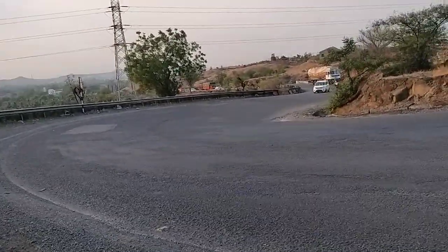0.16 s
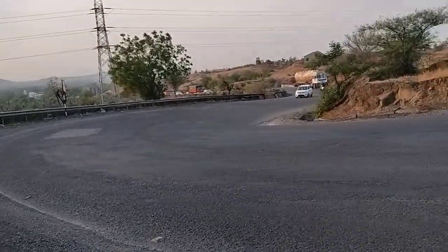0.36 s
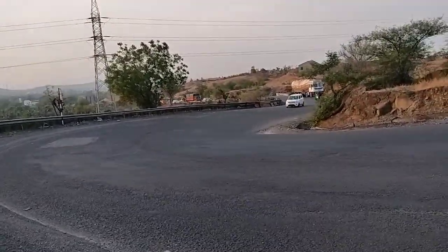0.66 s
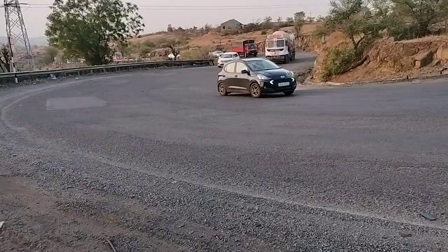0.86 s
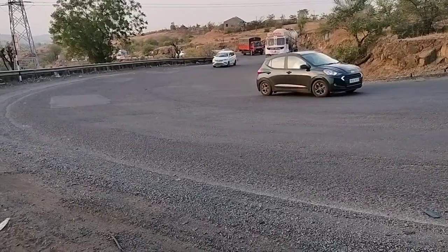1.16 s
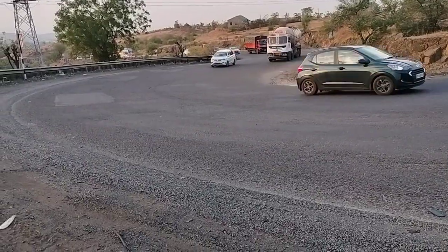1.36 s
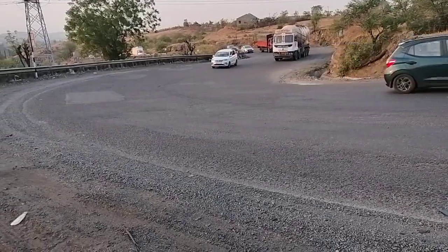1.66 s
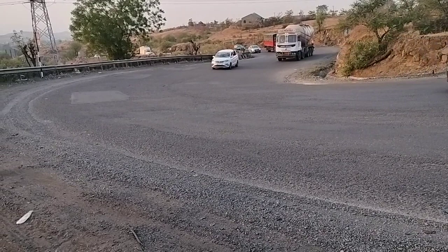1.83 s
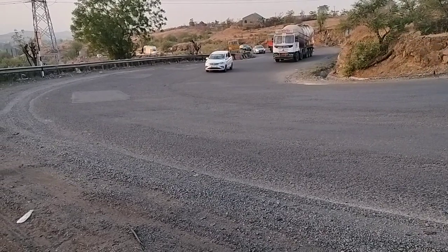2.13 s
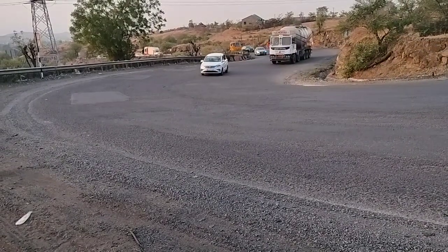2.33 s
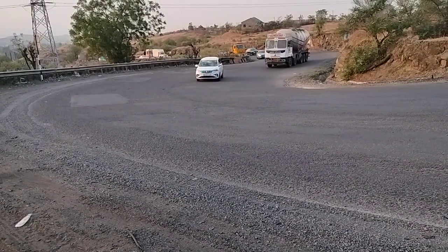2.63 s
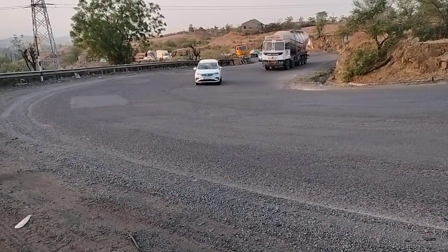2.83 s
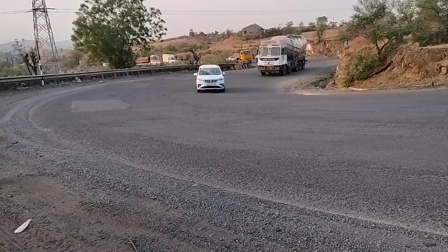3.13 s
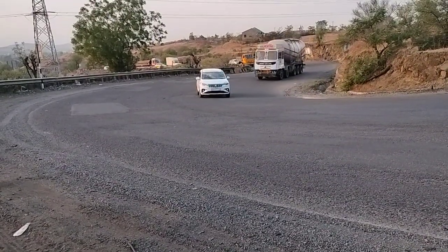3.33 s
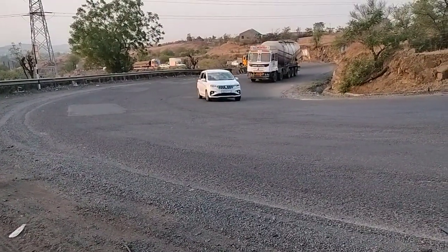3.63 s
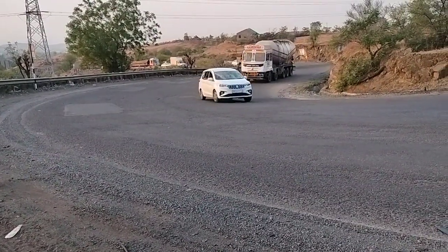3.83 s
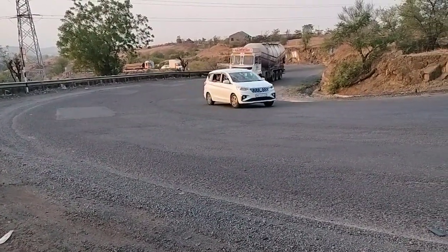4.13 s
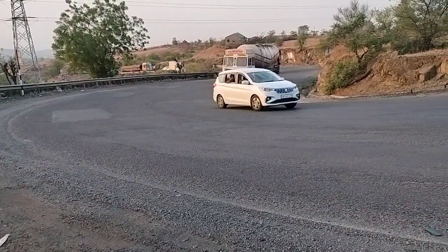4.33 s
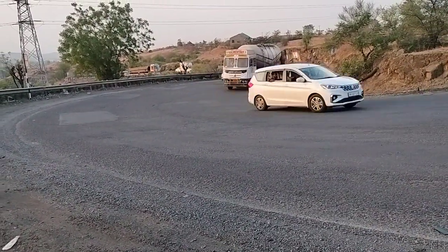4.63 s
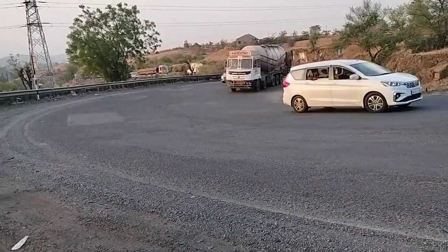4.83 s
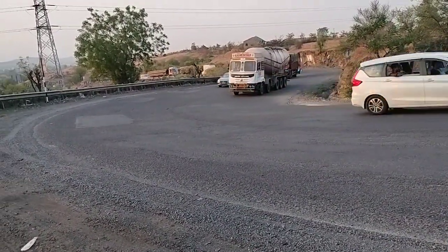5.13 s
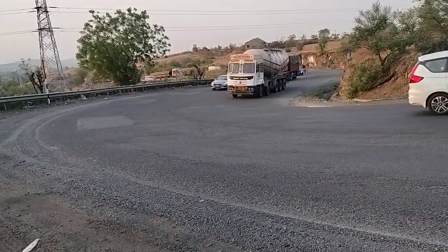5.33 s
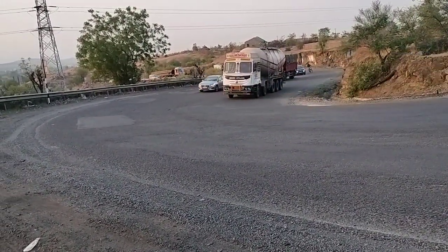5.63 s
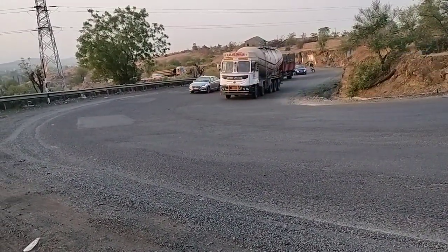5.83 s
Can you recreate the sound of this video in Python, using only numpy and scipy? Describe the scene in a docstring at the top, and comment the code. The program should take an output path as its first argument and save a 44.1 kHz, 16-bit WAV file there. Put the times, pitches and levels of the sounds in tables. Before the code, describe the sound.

From 0 to 0.77 s, a soft, dark rumble of distant engines and tyres is heard, with three low exhaust thumps and a faint steady hum. At about 0.77 s small sharp clicks mark an abrupt jump to loud, close traffic. A car sweeps past almost at once, its tyres roaring, then rasping over coarse asphalt with tiny stone crunches until about 1.9 s. Beneath it, heavy diesel trucks throb in a dense low-mid drone with rattling engine clatter, irregular exhaust puffs and wandering engine notes. A thin gear whine rises from 1 to 4 s. Around 4.5 s a second car partly masks the trucks; very faint brake squeaks come at 4.4-4.7 s, and its tyre roar peaks at 5 s. At 5.43 s one very short, rasping horn toot sounds, with quick rock echoes. The trucks keep growling to the end at 6 s. Wide roadside stereo, little reverberation.

```python
"""A far rumble of engines and tyres comes first, under heavy exhaust puffs; then, all at once, traffic is close.
Diesel trucks labour round a hill bend below a rock cutting: pulses at the firing rate ring exhausts and blocks.
Two cars sweep past on coarse asphalt: shaped noise gives tyre roar and hiss, and the cars screen the trucks.
Gliding sines make engine notes, a silencer boom, a gear whine and faint brake squeaks; a horn sounds once."""
import sys
import numpy as np
from scipy import signal
from scipy.fft import rfft, irfft, next_fast_len
from scipy.io import wavfile
from scipy.ndimage import uniform_filter1d, minimum_filter1d, map_coordinates

SR = 44100
rng = np.random.default_rng(int(sys.argv[2]) if len(sys.argv) > 2 else 0)


def inscribe(sig):
    """Save sig as 16-bit PCM at rate SR to the path in sys.argv[1].

    A 1-D sig is mono; a 2-D sig holds one channel per row.
    Samples are clipped to [-1, 1] before scaling.
    """
    pcm = np.round(np.clip(np.atleast_2d(sig).T, -1, 1) * 32767)
    wavfile.write(sys.argv[1], SR, pcm.astype(np.int16))


N = 264159

CLOSE_S, CLOSE_RISE_S = 0.768, 0.002  # when the near traffic takes over, and how long that takes
TOP_HZ = 15300  # upper band limit

# Far traffic, resonances of rumble and road noise: frequency_hz, gain_db
FAR_RUMBLE_BODY = [(21, -39), (35, -26), (91, -8.5), (136, -5), (176, 2), (231, -1), (324, -1), (350, -10),
                   (424, -8.5), (520, -23), (680, -48.5), (1140, -120)]
FAR_ROAD_BODY = [(260, -42), (450, -9), (477, 1), (762, 2.5), (1040, -5.5), (1350, -5), (1990, -14),
                 (2540, -11.5), (2780, -17), (3700, -20), (4550, -32.5), (5790, -36.5), (6950, -56),
                 (9040, -72), (15300, -120)]
FAR_RUMBLE_DB, FAR_ROAD_DB = -25.5, -35

# Likeness of the left and right signals, near and far: frequency_hz, likeness (1 = identical)
ALIKE = [(60, 0.94), (310, 1), (420, 0.76), (510, 0.54), (620, .95), (830, .93), (990, .55), (1370, 0.39),
         (1700, .7), (2050, 0.9), (2450, .36), (2900, .65), (3650, 0.36), (4500, .45)]
FAR_ALIKE = [(100, 0.25), (400, 0.52), (1600, 0.81), (3700, .12)]
# Level difference, left minus right, near and far: frequency_hz, difference_db
LEAN = [(80, 0.5), (220, 2), (400, 7), (550, -7), (970, 10.5), (1200, -1), (1500, -2.5), (1700, 8.5),
        (2600, 4), (3400, 3.5), (3950, -0.5), (5300, 2.5)]
FAR_LEAN = [(100, -9.5), (170, -8), (290, 1.5), (900, 3.5), (2300, 5.5), (6000, 0.5)]
# Phase by which the left microphone leads, near and far: frequency_hz, lead_rad
LEAD = [(330, .05), (470, -1), (580, .35), (910, .35), (1040, -2.5), (1250, -2.2), (1500, .3), (1950, -2.9),
        (2150, 1.9), (2300, .2), (2500, -2.3), (2750, 2.7), (3000, 1.1), (3900, .8), (4400, 1.9),
        (5500, .7)]
FAR_LEAD = [(300, -.1), (600, 1), (860, .5), (980, -2.8), (2600, -1.8)]
# Reverberation of the rock face: frequency_hz, t60_s
CUTTING = [(150, 0.25), (1000, 0.93), (3000, 0.6), (8000, 0.1)]

# Clicks as the traffic jumps closer: start_s, peak_db
CLICKS = [(0.771, -11.5), (0.793, -25), (0.813, -13.5)]
# Heavy exhaust puffs: start_s, gain_db
PUFFS = [(0.027, -13), (0.348, -13.5), (0.669, -13), (1.293, -8), (1.54, -10), (2.02, -9), (3.069, -7.5),
         (3.405, -9), (3.59, -8), (4.052, -9), (4.23, -8), (4.305, -8), (4.645, -8.5), (5.281, -7.5),
         (5.812, -8)]
# Engine notes that stand clear of the din: start_s, end_s, first_hz, last_hz, level_db
HUMS = [(-0.2, 0.8, 355, 356, -37), (0.75, 2.1, 98, 107, -37), (1.2, 3.7, 409, 447, -34),
        (1.0, 1.85, 558, 568, -38), (0.72, 1.08, 284, 295, -24.5), (1.15, 2.3, 247, 234, -23.5),
        (1.7, 3.4, 358, 349, -29.5), (1.85, 3.0, 297, 309, -26), (3.18, 3.55, 240, 245, -21.5),
        (3.35, 4.0, 303, 311, -22.5), (3.98, 4.32, 238, 244, -21.5), (4.22, 4.56, 288, 291, -21.5),
        (4.0, 4.9, 165, 174, -28.5), (4.5, 5.9, 104, 106, -38), (5.1, 5.5, 281, 280, -20.5),
        (5.65, 6.15, 319, 324, -24.5)]
HUM_FADE_S, HUM_WAVER_DB = 0.15, 1.6

# Brake linings: centre_s, half_length_s, pitch_hz, peak_db
SQUEAKS = [(4.45, 0.05, 2961, -49), (4.68, 0.08, 2961, -47), (4.62, .075, 3704, -45.5)]

# Horn diaphragm: harmonic_number, gain_db
HORN_HARMONICS = [(6, -23), (7, -28), (8, -43), (9, -35.5), (11, -49), (12, -48), (13, -58), (16, -71),
                  (18, -69), (19, -79)]
# Discrete horn echoes from the rocks: delay_s, gain_db
HORN_ECHOES = [(.044, -11), (.076, -18)]
HORN_HZ, HORN_RASP, HORN_T60_S = 435.2, 0.17, 0.025  # settled pitch, roughness, decay after release
HORN_SHARP, HORN_SETTLE_S = 0.025, 0.007  # share by which it starts sharp, and time constant of settling

# Passing cars: screening_centre_s, screening_db, closest_s, roar_db, hiss_db
CARS = [(1.2, 4, 0.82, -28, -39), (4.45, 4.5, 5.01, -22, -40)]
# Share of the screening felt by: clatter, tyre_roar, tread_hiss
SCREENED = (0.58, 0.94, 0.64)
SCREEN_S = 0.37  # half the time for which a car hides the trucks
PASS_S = 0.13  # a car's closest distance over its speed
# Resonance of a car's low drone: frequency_hz, gain_db
CAR_BODY = [(25, -44.5), (50, -22), (90, -7), (125, -2), (170, 9), (220, -11.5), (400, -42.5), (900, -100)]
CAR_DRONE_DB, DRONE_S = -29.5, 0.8  # level and half length

# Tyre roar, truck tread hiss and car tread hiss: frequency_hz, gain_db
ROAR = [(280, -36), (480, -9), (527, -9), (561, -5), (675, 1), (789, -0.5), (965, -4.5), (1080, -13.5),
        (1400, -15.5), (1820, -33.5), (3080, -120)]
TREAD = [(2400, -29.5), (3350, -11.5), (3720, -1), (4100, -5), (4550, -9.5), (5000, -7.5), (5600, -9),
         (6000, -13.5), (6400, -25), (7000, -26.5), (8000, -49), (10000, -100)]
CAR_TREAD = [(1000, -25.5), (2000, -7.5), (2900, -3), (3800, -4), (4600, -16.5), (6000, -21.5), (7000, -42),
             (10000, -100)]
ROAR_DB, HISS_DB = -20, -48  # the trucks' tyres
# Swells of the trucks' tread hiss: centre_s, rise_db
HISS_SWELLS = [(1.9, 2.5), (3.55, 5.5), (5.15, 3), (5.8, 4.5)]
SWELL_S = 0.4  # half the length of a swell

# Sideways tread rasp of the first car: frequency_hz, gain_db
SCRUB = [(1500, -35), (2400, -3.5), (2900, 4.5), (3300, -4), (3800, -4), (4500, -19.5), (7000, -47.5),
         (10000, -100)]
SCRUB_S, SCRUB_HALF_S, SCRUB_DB = 1.32, 0.55, -41
# Stones crunched under those tyres: start_s, level_db (10 dB above the rms at the height of the crunch)
STONES = [(0.962, -29), (1.004, -25)]

# Gear whine as a truck gathers speed: time_s, pitch_hz, level_db
WHINE = [(1.0, 1110, -51), (1.45, 1149, -45.5), (1.8, 1310, -41), (2.5, 1356, -48), (3.0, 1400, -44),
         (3.65, 1500, -41), (4.1, 1521, -41.5), (5.3, 1495, -52)]
BOOM_HZ, BOOM_WIDTH_HZ = 248.5, 13  # resonance of the tanker's silencer
BOOM_DB, BOOM_WAVER_DB = -19.5, 2

# Firing rates of the tanker and of the truck behind it: time_s, firing_hz
TANKER = [(0.77, 70.04), (1.3, 74.38), (2.2, 78.43), (3.5, 78.2), (5.1, 82.82), (5.65, 83.8), (6, 87.8)]
FOLLOWER = [(0.77, 96.4), (1.3, 101.8), (2, 107.7), (2.7, 109.6), (3.6, 104.3), (4.4, 98.23), (5.3, 97.5),
            (6, 107)]
# Resonance of the exhaust pipes and of the engine blocks: frequency_hz, gain_db
PIPE = [(25, -48), (45, -32.5), (75, -24.5), (100, -18.5), (125, -12), (172, -5.5), (208, -5), (245, -1),
        (290, 1), (335, -2.5), (400, -8.5), (440, -10.5), (480, -19.5), (560, -20), (730, -40.5),
        (1300, -100)]
BLOCK = [(650, -28), (1100, 0), (1320, -6.5), (1670, 2.5), (1970, -9), (2230, -1), (2650, -9), (2920, -7.5),
         (3260, -11.5), (3610, -14.5), (4200, -35.5), (5460, -45), (9240, -120)]
# Modes of the thin engine covers: centre_hz, width_hz, gain_db
COVERS = [(1706, 110, -1.5), (2240, 170, -6), (3060, 600, -17.5), (3610, 94, -13.5), (3980, 120, -21)]
# Exhausts as they surge and ease: time_s, level_db
EXHAUST = [(0.77, -15), (1.1, -15.5), (1.5, -17.5), (1.9, -15.5), (2.6, -15.5), (2.97, -16), (3.15, -16),
           (3.65, -16), (3.95, -18), (4.25, -16), (4.65, -17), (4.78, -19.5), (5.0, -15), (5.4, -18.5),
           (5.8, -14.5), (6, -15)]
# Engine clatter: time_s, gain_db
CLATTER = [(0.77, -32.5), (2.9, -30), (3.95, -29.5), (4.4, -32), (6, -33)]
DEEP_DB = -0.5  # loss of the deepest throb


def amp(db):
    """Decibel law: 20 dB is a tenfold gain."""
    return 10 ** (np.asarray(db) / 20)


def tilt(db):
    """Intensity stereo: raise the left by db and lower the right by as much."""
    return amp([[db], [-db]])


def unit(x):
    """Normalisation: scale to rms 1."""
    return x / np.sqrt(np.mean(x ** 2) + 1e-20)


def clock():
    """Sampling: the time of each sample in seconds."""
    return np.arange(N) / SR


def along(points, hz):
    """Logarithmic frequency scale: interpolate (Hz, value) points along it."""
    f, v = np.transpose(points)
    return np.interp(np.log(hz + 1), np.log(f + 1), v)


def curves(rows):
    """Linear interpolation: one value per sample for each column after the time."""
    s, *cols = np.transpose(rows)
    return [np.interp(clock(), s, c) for c in cols]


def wobble(rate):
    """Band-limited fluctuation: a smooth random curve, rate knots a second."""
    knots = rng.standard_normal(int(N * rate / SR) + 4)
    return map_coordinates(knots, [clock() * rate])


def swell(at_s, half_s, order=2):
    """Gaussian envelope: a hump of height 1; a higher order flattens its top."""
    return np.exp(-np.abs((clock() - at_s) / half_s) ** order)


def filtered(x, response):
    """Linear filtering: multiply the spectrum of x by a response of frequency."""
    m = next_fast_len(N + SR // 2)
    return irfft(rfft(x, m) * response(np.fft.rfftfreq(m, 1 / SR)), m)[..., :N]


def ring(x, spectrum, size=8192):
    """Minimum-phase resonance: a folded cepstrum gives a causal body with this spectrum."""
    gain = amp(along(spectrum, np.fft.rfftfreq(size, 1 / SR)))
    cepstrum = irfft(np.log(gain + 1e-6))
    fold = 1 + np.sign(size // 2 - np.arange(size)) * (np.arange(size) > 0)
    impulse = irfft(np.exp(rfft(cepstrum * fold)))
    return signal.fftconvolve(x, impulse[None], axes=1)[:, :N]


def spread(pair, alike, lean, lead=LEAD):
    """Interchannel coherence: mix two unrelated signals into two microphones whose mean has rms 1."""
    def ports(hz):
        width = np.tan(np.arccos(np.clip(along(alike, hz), -.95, 1)) / 2)
        lead_hz, radians = np.transpose(lead)
        half_lead = along(np.column_stack([lead_hz, np.unwrap(radians)]), hz) / 2
        side = np.array([[1], [-1]])
        gain = amp(side * along(lean, hz) / 2) * np.exp(1j * side * half_lead)
        mix = np.array([gain, gain * side * width])
        return mix / np.linalg.norm(mix.mean(1), axis=0)
    both = filtered(pair[:, None], ports).sum(0)
    return both / np.std(both.mean(0))


def rush(patchy_db):
    """Turbulence: two noises share patches of gain that drift over time and frequency."""
    z = signal.stft(rng.standard_normal((2, N)), nperseg=512)[2]
    field = rng.standard_normal(z.shape[1:])
    field = uniform_filter1d(field, size=4, axis=0)
    field = uniform_filter1d(field, size=14, axis=1)
    return unit(signal.istft(z * amp(patchy_db * unit(field)), nperseg=512)[1][:, :N])


def echo(x):
    """Diffuse reflection: the rock face answers each side with decaying noise."""
    hz, t, z = signal.stft(rng.standard_normal((2, SR // 2)), SR, nperseg=256)
    decay = amp(-60 * t / along(CUTTING, hz)[:, None])
    tail = signal.istft(z * decay, SR, nperseg=256)[1]
    return signal.fftconvolve(x[None], tail / np.linalg.norm(tail[0]), axes=1)[:, :N]


def firings(speed, uneven, scatter, jitter_s, count=6):
    """Periodic excitation: one pulse per firing, uneven by cylinder and by chance in strength and time."""
    turns = np.cumsum(curves(speed)[0] * (1 + 0.0029 * wobble(6))) / SR
    k = np.arange(1, int(turns[-1]))
    chance = rng.standard_normal((len(k), 2))
    cylinders = rng.standard_normal(count)
    cylinders = unit(cylinders - cylinders.mean())
    strength = np.exp(uneven * cylinders[k % count] + scatter * chance[:, 0])
    at = (np.interp(k, turns, clock()) + jitter_s * chance[:, 1]) * SR
    return unit(np.bincount(np.clip(at, 0, N - 1).astype(int), strength, N))


def bursts(pulses, decay_s):
    """Exponential relaxation: an envelope jumps at every pulse and dies away."""
    return unit(signal.lfilter([1], [1, -np.exp(-1 / (decay_s * SR))], pulses))


def far_traffic(firing_hz=58.6):
    """Diffuse sound: engines up the hill arrive as reflected firings and noise, their tyres as noise."""
    pulses = firings([(0, firing_hz)], uneven=0.26, scatter=0.47, jitter_s=0.001)
    engines = amp(-14.5) * echo(pulses) + rush(patchy_db=1.0)
    rumble = spread(ring(engines, FAR_RUMBLE_BODY), FAR_ALIKE, FAR_LEAN, FAR_LEAD)
    road = spread(ring(rush(patchy_db=0.1), FAR_ROAD_BODY), FAR_ALIKE, FAR_LEAN, FAR_LEAD)
    return amp(FAR_RUMBLE_DB) * rumble + amp(FAR_ROAD_DB) * road


def clicks(decay_s=0.00075):
    """Transient: each click is a sharp step of pressure that drains at once."""
    t = clock()
    return sum(amp(db) * (t >= s) * np.exp(-np.abs(t - s) / decay_s) for s, db in CLICKS)


def puffs(pipe_hz=250, t60=0.05, rise_s=0.0029, low_hz=110):
    """Damped oscillation: each heavy puff is a thump at the resonance of an exhaust pipe."""
    out = np.zeros(N)
    for s, db in PUFFS:
        t = np.maximum(clock() - s, 0)
        hz = pipe_hz * (1 + 0.025 * rng.normal())
        thump = np.sin(2 * np.pi * hz * t) * amp(-60 * t / t60) * (1 - np.exp(-t / rise_s))
        out += amp(db) * thump / np.abs(thump).max()
    high_pass = signal.butter(2, low_hz, "high", fs=SR, output="sos")
    return signal.sosfilt(high_pass, out) * tilt(1.8)


def hums():
    """Partial tones: single engine notes swell out of the din, glide with the revs and sink back."""
    t, out = clock(), np.zeros(N)
    for start, end, first_hz, last_hz, db in HUMS:
        hz = np.interp(t, [start, end], [first_hz, last_hz]) * (1 + .003 * wobble(12))
        fade = np.clip(np.minimum(t - start, end - t) / HUM_FADE_S, 0, 1)
        tone = np.sqrt(2) * np.sin(2 * np.pi * np.cumsum(hz) / SR)
        out += fade * amp(db + HUM_WAVER_DB * wobble(11)) * tone
    return out * tilt(1.5)


def brake():
    """Friction-driven vibration: the brake linings squeak faintly as unsteady sines."""
    out = np.zeros(N)
    for s, half_s, hz, db in SQUEAKS:
        phase = 2 * np.pi * np.cumsum(hz * (1 + 0.0008 * wobble(150))) / SR
        out += amp(db) * swell(s, half_s) * np.sin(phase)
    return out


def horn(start_s=5.43, stop_s=5.488, rise_s=0.0058, gong_hz=3100, gong_t60=0.09, gong_db=-21, dull_hz=3500):
    """Forced vibration: a rasping diaphragm starts sharp and strikes its tone disc; dull echoes return."""
    t = clock()
    sounding, released = np.maximum(t - start_s, 0), np.maximum(t - stop_s, 0)

    def attack(k):  # higher harmonics speak sooner
        return (1 - np.exp(-sounding / rise_s * (k / 6) ** 3)) ** 2

    def rocks(hz):
        delayed = sum(amp(db) * np.exp(-2j * np.pi * hz * s) for s, db in HORN_ECHOES)
        return delayed / (1 + (hz / dull_hz) ** 10)

    pitch = HORN_HZ * (1 + HORN_SHARP * np.exp(-sounding / HORN_SETTLE_S) + 0.0019 * wobble(110))
    phase = 2 * np.pi * np.cumsum(pitch) / SR
    ports = np.array([[.35], [-.35]])  # radians: the left microphone leads
    buzz = 0
    for k, db in HORN_HARMONICS:
        rasp = 1 + HORN_RASP * k / 6 * wobble(450)
        buzz = buzz + attack(k) * amp(db) * rasp * np.sin(k * phase + ports)
    disc_noise = rng.standard_normal((2, N))
    disc = unit(filtered(disc_noise, lambda hz: np.exp(-((hz - gong_hz) / 130) ** 2)))
    toot = amp(5.5 - 60 * released / HORN_T60_S) * buzz
    toot = toot + attack(9.6) * amp(gong_db - 60 * sounding / gong_t60) * disc
    return toot * tilt(2.8) + filtered(toot, rocks) + amp(-22.5) * echo(toot[0])


def car_drone(lag_s=0.076):
    """Resonance: each car drones low while it is side-on, as noise through a low body."""
    nearness = sum(swell(s + lag_s, DRONE_S) for s, *_ in CARS)
    return amp(CAR_DRONE_DB) * nearness * spread(ring(rush(patchy_db=1.5), CAR_BODY), ALIKE, LEAN)


def scrub(stone_s=0.0027):
    """Lateral friction: the first car's cornering tread rasps over coarse asphalt and crunches stones."""
    rasp = amp(SCRUB_DB + 2.1 * wobble(160)) * swell(SCRUB_S, SCRUB_HALF_S)
    crunch = sum(amp(db - 10) * swell(s + stone_s, stone_s) for s, db in STONES)
    return (rasp + crunch) * spread(ring(rush(patchy_db=0.2), SCRUB), ALIKE, LEAN)


def screening():
    """Acoustic shadow: dB lost by clatter, tyre roar and tread hiss while a car hides the trucks."""
    loss_db = sum(db * swell(s, SCREEN_S, order=6) for s, db, *_ in CARS)
    return [share * loss_db for share in SCREENED]


def passing(closest_s, db):
    """Distance law: a car's tyres are loudest when it is closest and fade with distance."""
    return amp(db) / (1 + ((clock() - closest_s) / PASS_S) ** 2) ** 1.3


def tyres():
    """Contact noise: tread roars and grit crackles under it, steadily for trucks, briefly for cars."""
    _, roar_loss_db, hiss_loss_db = screening()
    car_roar_gain = sum(passing(s, db) for _, _, s, db, _ in CARS)
    car_hiss_gain = sum(passing(s, db) for _, _, s, _, db in CARS)
    swell_db = sum(db * swell(s, SWELL_S) for s, db in HISS_SWELLS)
    roar = spread(ring(rush(patchy_db=0.66), ROAR), ALIKE, LEAN)
    grit = amp(1.2 * wobble(700))
    hiss = spread(ring(rush(patchy_db=1.1) * grit, TREAD), ALIKE, LEAN)
    car_hiss = spread(ring(rush(patchy_db=2.3) * grit, CAR_TREAD), ALIKE, LEAN)
    roar_gain = np.hypot(amp(ROAR_DB - roar_loss_db), car_roar_gain)  # powers of trucks and cars add
    hiss_gain = amp(HISS_DB + swell_db - hiss_loss_db)
    return roar_gain * roar + hiss_gain * hiss + car_hiss_gain * car_hiss


def gears():
    """Tooth-mesh tone: meshing teeth sing one thin, unsteady line."""
    hz, db = curves(WHINE)
    phase = 2 * np.pi * np.cumsum(hz * (1 + 0.0056 * wobble(40))) / SR
    waver_db = 3.7 * np.array([wobble(10.0), wobble(8.7)])  # separate for left and right
    return amp(db + waver_db) * np.sin(phase + np.array([[1.2], [-1.2]]))


def boom(order=3):
    """Resonant amplification: the silencer drones when one order of the tanker's engine meets its mode."""
    hz = order * curves(TANKER)[0]
    resonance = 1 / (1 + (2 * (hz - BOOM_HZ) / BOOM_WIDTH_HZ) ** 2)
    phase = 2 * np.pi * np.cumsum(hz * (1 + 0.01198 * wobble(15))) / SR
    return resonance * amp(BOOM_DB + BOOM_WAVER_DB * wobble(22)) * np.sin(phase) * tilt(1.8)


def covers(knocks):
    """Modal vibration: the thin engine covers ring in narrow bands."""
    def modes(f):
        total = sum(amp(db) * 1j * f * np.sqrt(w) / (c * c - f * f + 1j * f * w) for c, w, db in COVERS)
        return total / (1 + (f / 5000) ** 12)
    return spread(filtered(knocks, modes), ALIKE, LEAN)


def trucks(deep_hz=130):
    """Source and resonator: firings ring the exhausts, drive turbulent gas and rattle the engine blocks."""
    tanker = firings(TANKER, uneven=0.34, scatter=.32, jitter_s=.0004)
    follower = firings(FOLLOWER, uneven=0.45, scatter=0.27, jitter_s=0.00041)
    # the tanker's beat firms up as it nears
    pulses = amp(-5 + 0.63 * clock()) * tanker + amp(-9.0) * follower
    gas = rush(patchy_db=-0.15) * unit(1.1 + bursts(pulses, decay_s=0.0048))
    direct = np.array([pulses, echo(pulses)[0]])
    drive = direct + amp(-1.5) * echo(pulses) + amp(5) * gas
    exhaust = spread(ring(drive - drive.mean(), PIPE), ALIKE, LEAN)
    deep = filtered(exhaust, lambda hz: 1 / (1 + (hz / deep_hz) ** 8))
    exhaust = exhaust + (amp(DEEP_DB) - 1) * deep
    knocks = rush(patchy_db=0.0) * (2.0 + bursts(pulses, decay_s=0.018))
    block = spread(ring(knocks, BLOCK), ALIKE, LEAN)
    clatter = amp(0.36) * block + amp(-11) * covers(knocks)
    return amp(curves(EXHAUST)[0]) * exhaust + amp(curves(CLATTER)[0] - screening()[0]) * clatter


def scene():
    """Superposition: far traffic gives way abruptly to near vehicles; the other sources simply add."""
    near = np.clip((clock() - CLOSE_S) / CLOSE_RISE_S, 0, 1)
    vehicles = car_drone() + scrub() + tyres() + gears() + boom() + trucks()
    background = (1 - near) * far_traffic()
    return background + clicks() + puffs() + hums() + brake() + horn() + near * vehicles


def record(dry, ceiling=0.8, size=400):
    """Peak limiting: a smoothed gain holds down the highest peaks; a steep low-pass sets the band limit."""
    needed = np.minimum(1, ceiling / (np.abs(dry).max(0) + 1e-9))
    gain = minimum_filter1d(needed, size)  # size in samples
    gain = uniform_filter1d(uniform_filter1d(gain, size // 2), size // 2)
    return filtered(dry * gain, lambda hz: 1 / (1 + (hz / TOP_HZ) ** 40))


dry = scene()
out = record(dry)
inscribe(out)
```